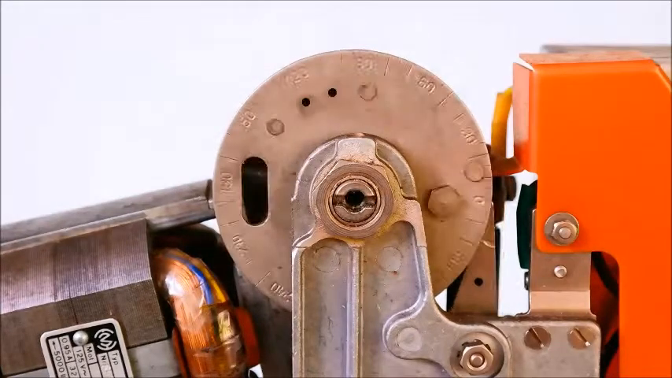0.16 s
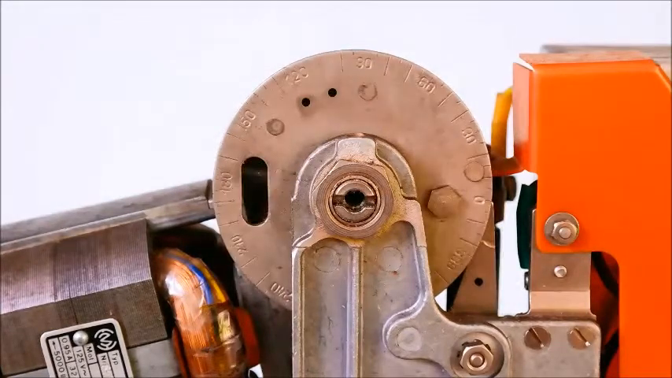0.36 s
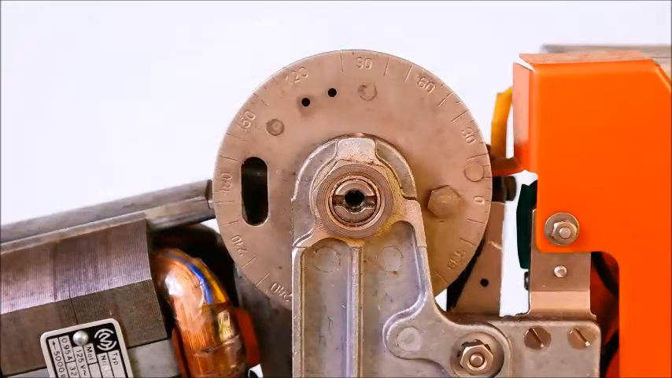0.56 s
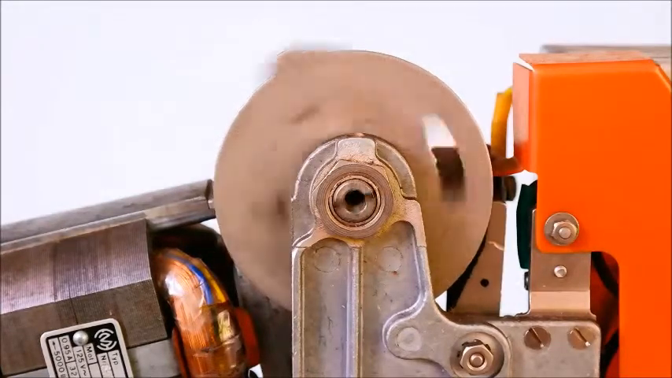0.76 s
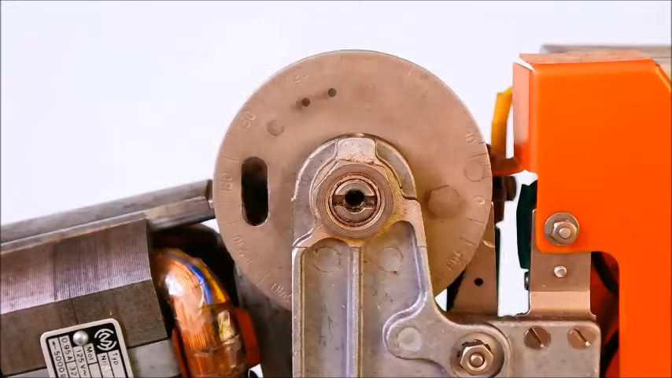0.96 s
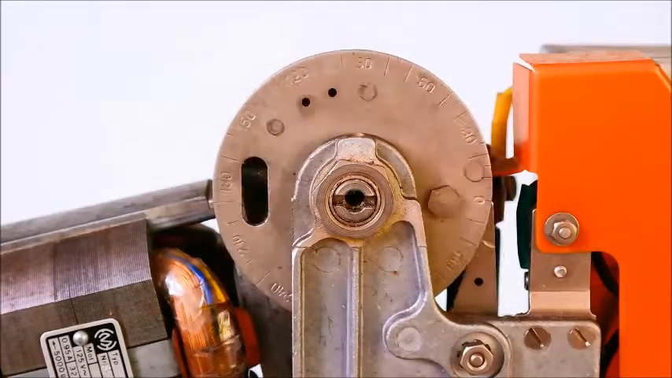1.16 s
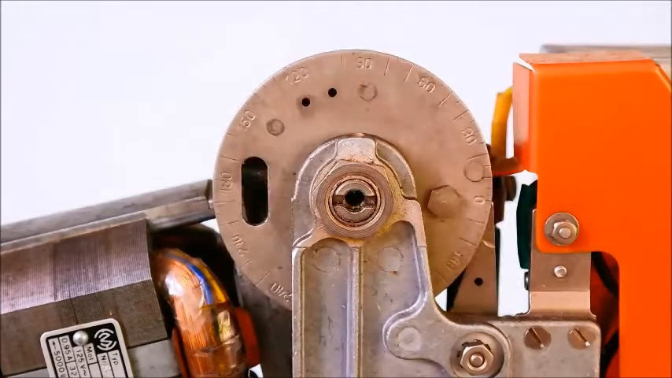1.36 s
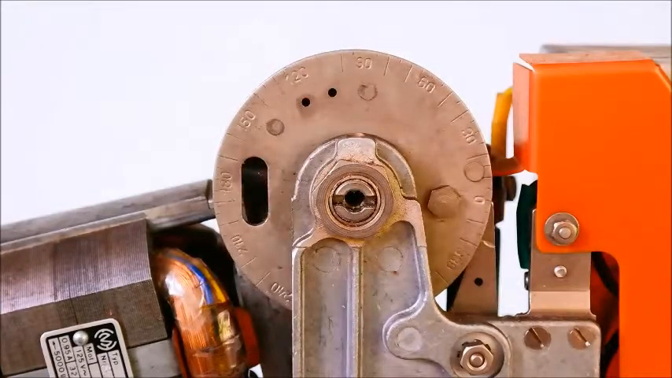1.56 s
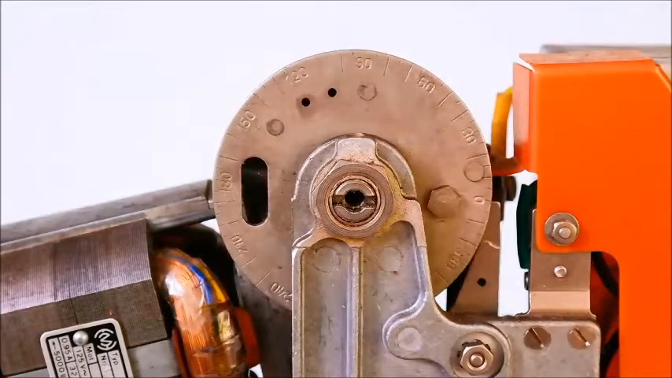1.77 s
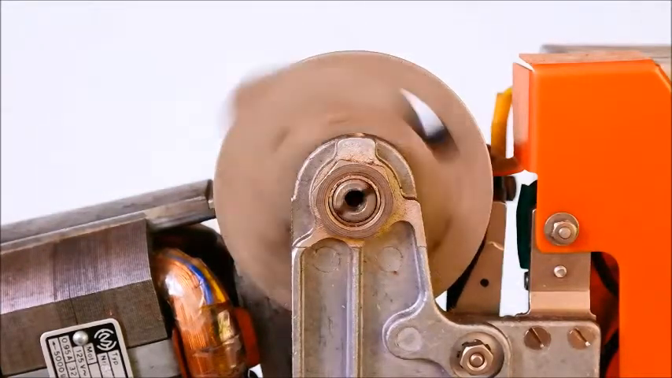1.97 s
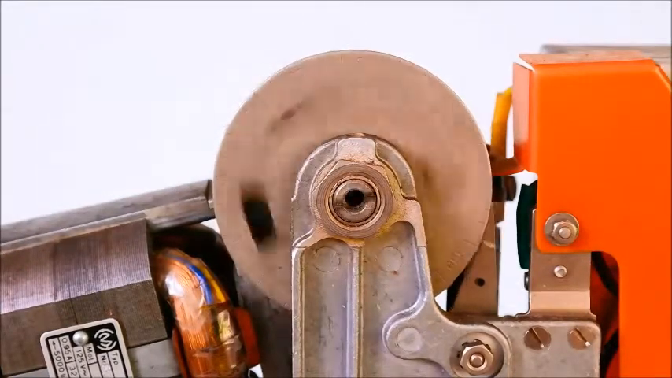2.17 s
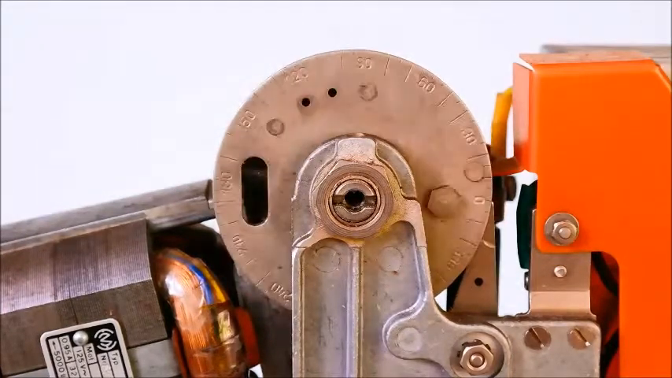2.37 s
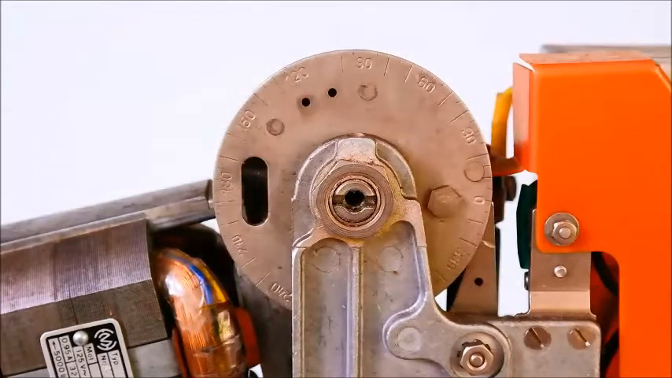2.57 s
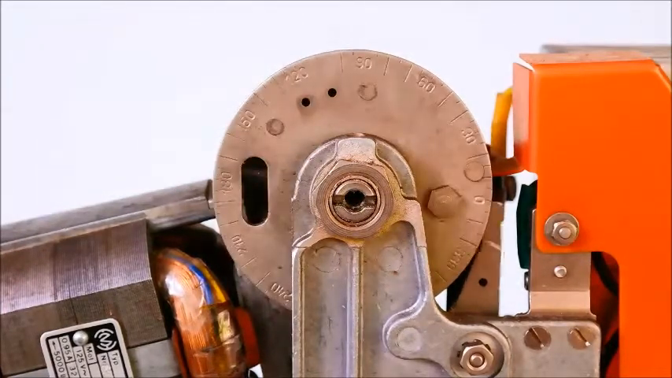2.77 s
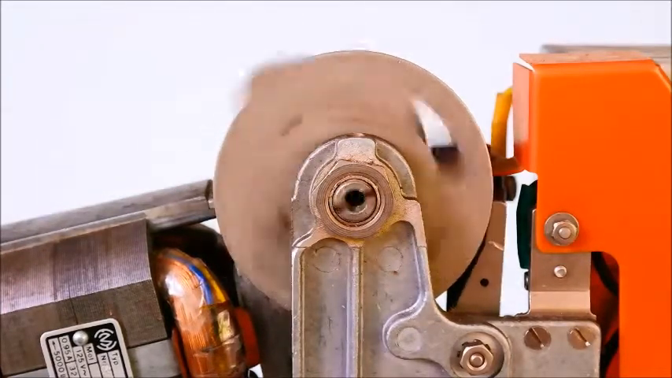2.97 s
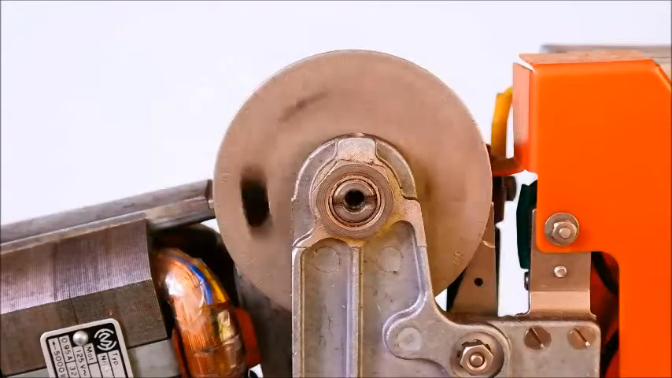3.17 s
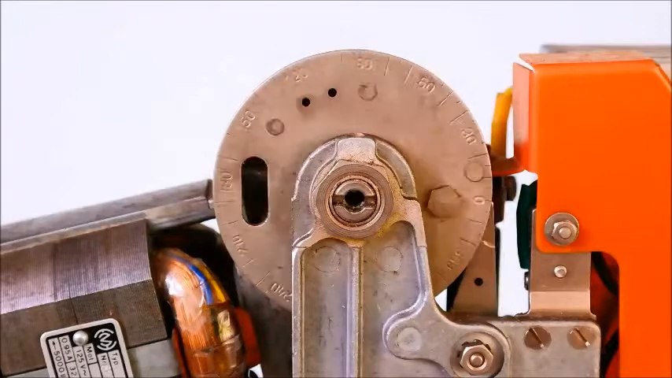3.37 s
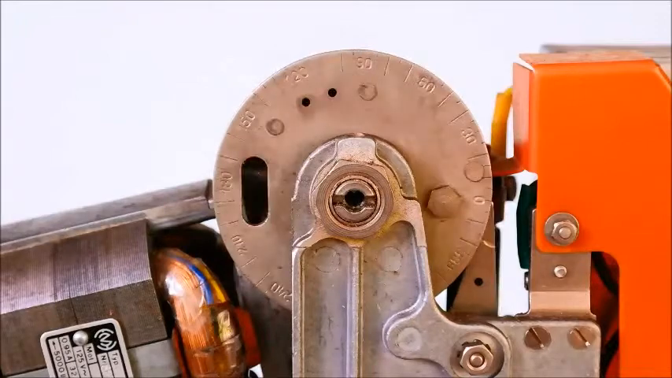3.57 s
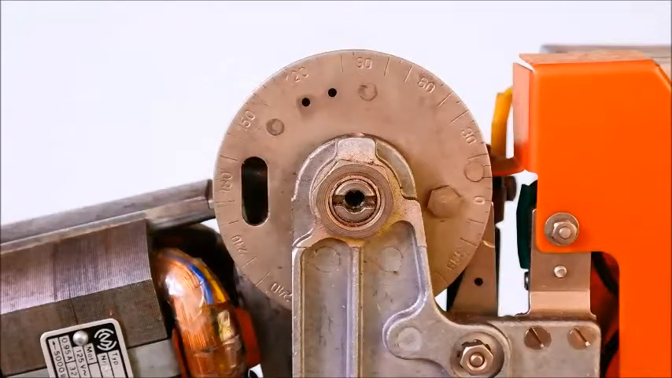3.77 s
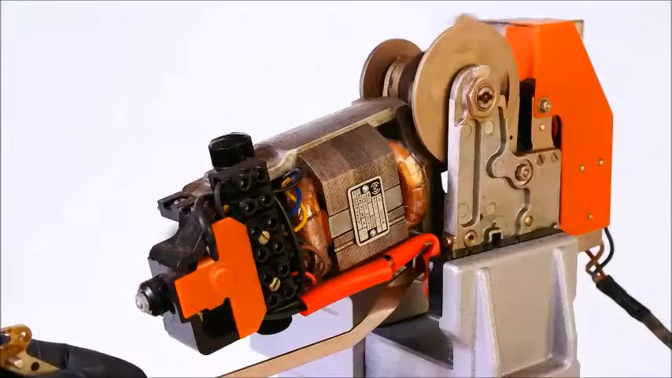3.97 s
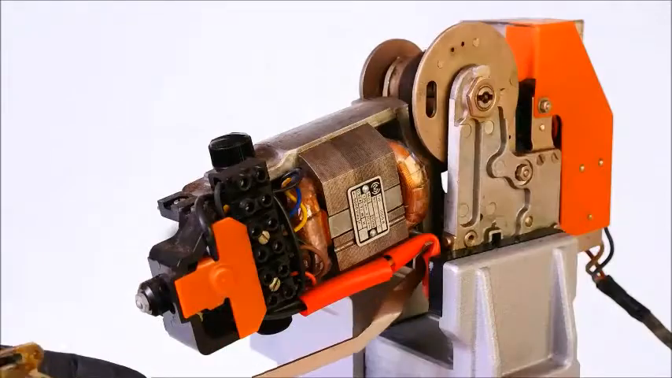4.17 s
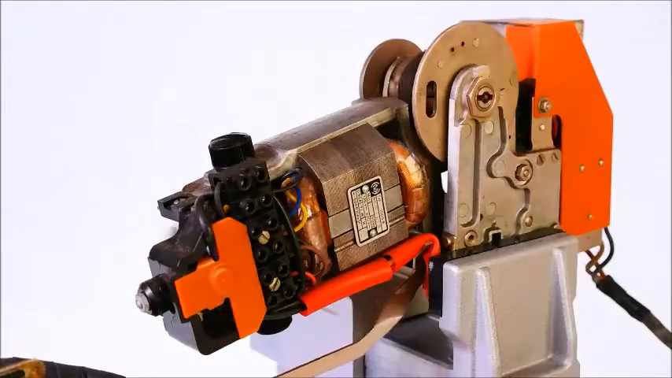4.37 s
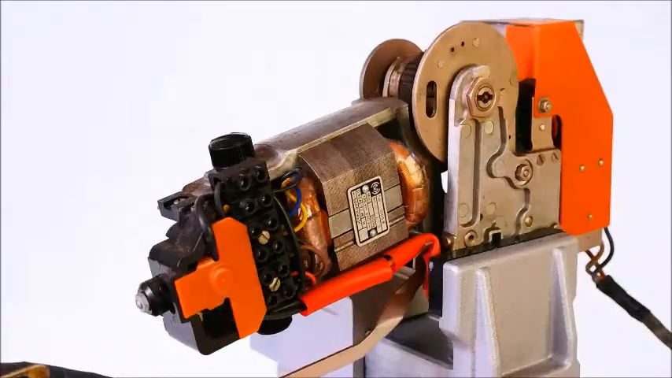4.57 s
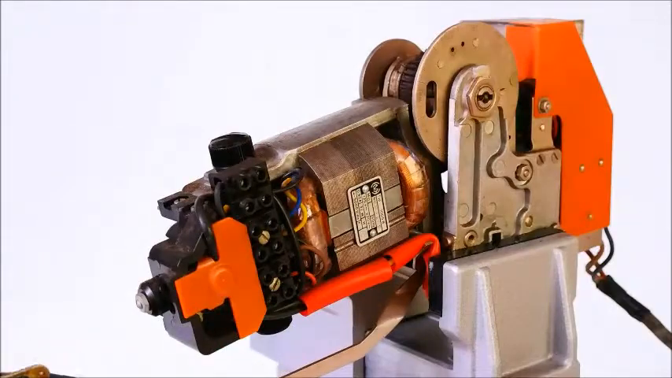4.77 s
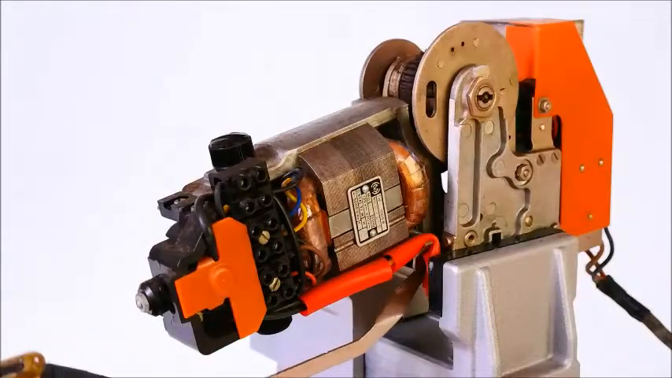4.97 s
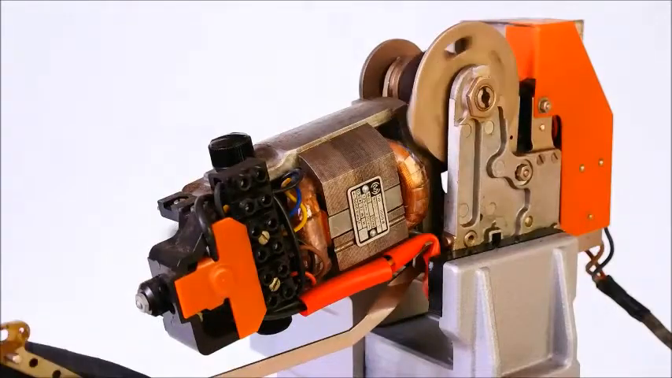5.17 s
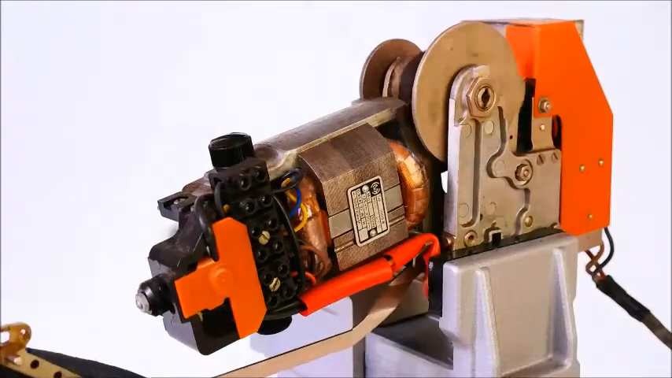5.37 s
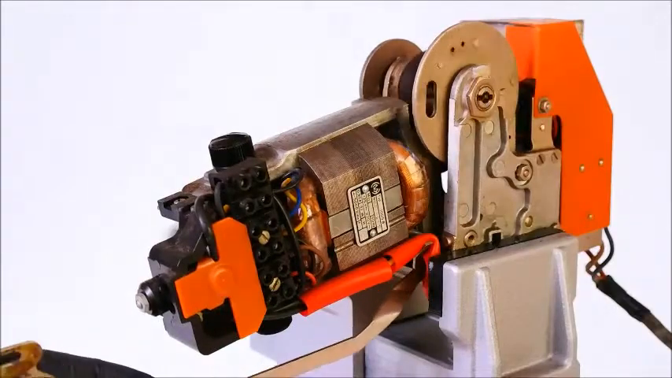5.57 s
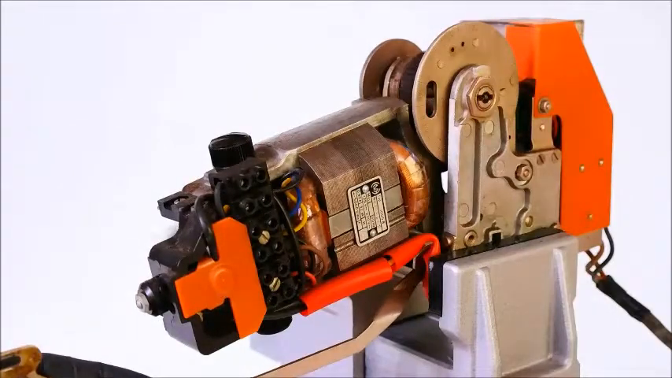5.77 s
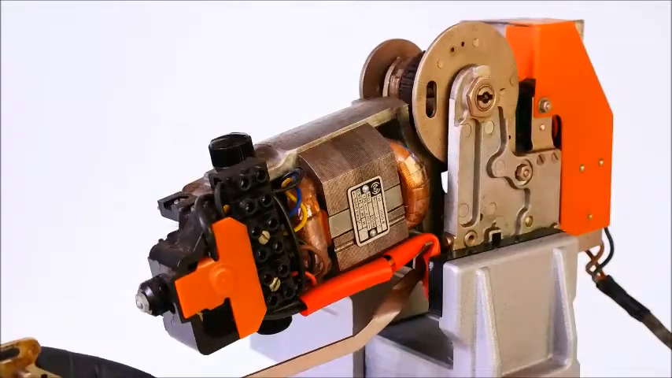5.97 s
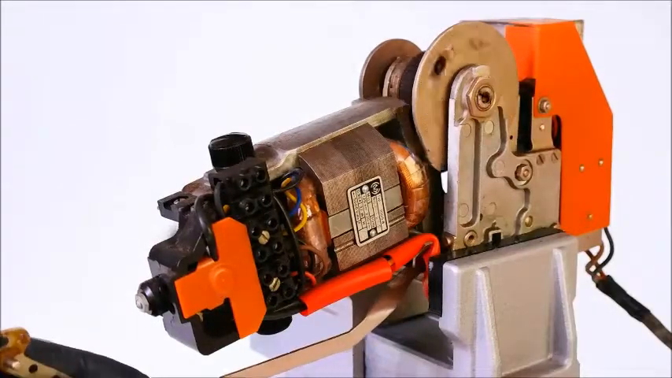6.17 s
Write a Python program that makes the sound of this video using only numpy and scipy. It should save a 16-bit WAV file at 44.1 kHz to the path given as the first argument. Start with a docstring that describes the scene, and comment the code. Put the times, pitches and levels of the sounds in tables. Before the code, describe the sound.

Close, dry stereo sound of a small mains motor and gears cycling on a table indoors, over faint low hum and air noise. At 0 s a metallic rattle ends a run and the rotor coasts down in a fluttering hiss, fading by about 0.5 s, with a small tick. A steel scrape at 0.64 s leads to a hard clack at 0.67; bright brush hiss, gear rumble and coil buzz run until a crunch and clattering release near 1.07, then coasting. Thin squeaks follow around 1.4 and 1.5 s. Similar bursts run 1.87-2.29 and 2.88-3.28 s, with low bumps at some starts and stops. At 3.87 s the sound cuts abruptly to the motor end, already spinning up, somewhat softer, releasing at 4.23. Light scraping and ticks come around 4.6-5.0 s, another burst at 5.15-5.54, and a last start with a clack at 6.20 s.

```python
"""Small mains motor, worm gear and one-turn clutch in short cycles on a table indoors, over air noise and hum.
At 0 s the pawl rattles out (struck modes) and the rotor coasts down (filtered, slot-beaten noise). From 0.64 s
a lever scrapes (stick-slip noise), the pawl clacks in, brushes and gears whirr, the coil buzzes (sines), the
pawl grinds (noise) and rattles out; thin squeaks follow. Starts near 0.67, 1.87 and 2.88 s; near 3.88 s a cut to
the motor end, already spinning up, then starts near 5.15 and 6.20 s. Low swells mark some starts and stops."""
import sys
import numpy as np
from scipy import signal
from scipy.fft import rfft, irfft, next_fast_len
from scipy.io import wavfile
from scipy.ndimage import uniform_filter1d

SR = 44100
rng = np.random.default_rng(int(sys.argv[2]) if len(sys.argv) > 2 else 0)


def output_pcm(signal):
    """Save a mono or channel-first signal as 16-bit PCM at the path in sys.argv[1].

    Samples are clipped to [-1, 1] before scaling.
    """
    pcm = np.clip(np.atleast_2d(signal).T, -1, 1) * 32767
    wavfile.write(sys.argv[1], SR, np.round(pcm).astype(np.int16))


def elevation(decibels):
    """Turn decibel levels (scalar or array-like) into linear amplitude ratios."""
    levels = np.asarray(decibels, float)
    return 10 ** (levels / 20)


N = 274302
SIZE = next_fast_len(N + 16384)
HZ, TIME = np.fft.rfftfreq(SIZE, 1 / SR), np.arange(N) / SR
TURN_S = 3.872  # cut: gear side before, motor end after
HUM_HZ = 98.9

# motor cycles: power on t/s, clutch out t/s, spin-up depth/dB (before layer share),
# base hiss level/dB, free coasting/s
CYCLES = [(-.4, 0.007, 15, -11.5, 0.34), (0.669, 1.069, 14.5, -11.5, 0.28),
          (1.866, 2.289, 29.5, -11.5, 0.34), (2.875, 3.279, 16.5, -11.5, 0.28),
          (3.877, 4.232, 8, -16.5, 0.25), (5.153, 5.539, 2.5, -17.5, .28), (6.201, 6.6, 6, -23, .28)]
# pawl modes: f/Hz, width/Hz, level/dB
PAWL_MODES = [(1430, 50, 11.5), (2920, 1240, 5), (3920, 2200, -3.5), (4970, 1200, -1), (6130, 720, 4),
              (7400, 360, 0.5), (8370, 700, -11.5), (9790, 310, 8.5), (11100, 800, -13.5), (12460, 220, 6),
              (13800, 500, 1.5), (14300, 290, 9)]


def evened(x):
    """Scales to rms 1."""
    return x / np.sqrt(np.mean(x ** 2) + 1e-20)


def smooth_noise(shape, *sizes):
    """Gaussian noise through moving averages of the given lengths in samples, rms 1."""
    x = rng.standard_normal(shape)
    for size in sizes:
        x = uniform_filter1d(x, size)
    return evened(x)


def read(points, hz):
    """Reads a table on a log-frequency axis."""
    f, value = np.transpose(points)
    return np.interp(np.log(hz + 1), np.log(f + 1), value)


def humps(peaks, hz):
    """Summed power of resonance curves."""
    return sum(elevation(db) ** 2 / (1 + (2 * (hz - f) / width) ** 2) for f, width, db in peaks)


def causal(gain, size):
    """Gives a magnitude its minimum phase, so that nothing rings before it is struck."""
    cepstrum = irfft(np.log(gain + 1e-5 * gain.max()), size)
    cepstrum[1:size // 2] *= 2
    cepstrum[size // 2 + 1:] = 0
    return np.exp(rfft(cepstrum))


def pair():
    """White noise at two microphone ports, partly shared, with phase lead and level lean by frequency."""
    # likeness of the ports: f/Hz, left-right coherence (0-1)
    likeness = [(40, 0.73), (150, 0.87), (400, 0.83), (900, 0.72), (1800, 0.51), (3000, 0.3), (6000, 0.25),
                (15000, 0.26)]
    # phase of the shared part: f/Hz, lead of left/rad
    lead_rad = [(100, -0.27), (3300, -0.13), (4200, -0.057), (6000, 0.61), (9400, 1.), (11000, 0),
                (13600, -1.1), (15500, -.3)]
    # balance: f/Hz, left minus right/dB
    lean_db = [(60, -1), (150, 1.5), (380, 0.5), (950, 1.5), (2380, -0.5), (5980, 1.5), (15000, 1.5)]
    left, other = rfft(rng.standard_normal((2, SIZE)))
    same = np.clip(read(likeness, HZ), 0, 1)
    right = same * left * np.exp(-1j * read(lead_rad, HZ)) + np.sqrt(1 - same ** 2) * other
    balance = elevation(np.outer([.5, -.5], read(lean_db, HZ)))
    return irfft(np.array([left, right]) * balance, SIZE)[:, :N]


def colour(x, gain):
    """Filters white sound by a magnitude scaled to mean power 1."""
    return irfft(rfft(x, SIZE) * causal(evened(gain), SIZE), SIZE)[:, :N]


def powered(fade_s=0.004):
    """1 from power on to clutch out, then a linear fade to 0."""
    return sum(np.clip((off + fade_s - TIME) / fade_s, 0, 1) * (TIME >= on) for on, off, *_ in CYCLES)


def hum_level(surge_s=0.057, dip_db=-15, dip_after_s=0.075, dip_s=0.042,
              fade_db=-7, fade_after_s=0.51, fade_s=.05):
    """Hum gain: up under power, surging at switch-on, dipping briefly after clutch out, fainter at rest."""
    # hum at the gear side: idle level/dB, powered level/dB, surge/dB
    hum_side = (-56.5, -45.5, 8.2)
    # hum at the motor end: same columns
    hum_end = (-56.5, -52, .1)
    idle_db, on_db, surge_db = np.where(TIME > TURN_S, np.reshape(hum_end, (3, 1)), np.reshape(hum_side, (3, 1)))
    since_on, since_off = np.zeros(N), np.zeros(N)
    for on, off, *_ in CYCLES:
        since_on = np.where(TIME >= on, TIME - on, since_on)
        since_off = np.where(TIME >= on, TIME - off, since_off)
    db = idle_db + (on_db - idle_db) * powered() + surge_db * np.exp(-since_on / surge_s)
    db = db + dip_db * np.exp(-((since_off - dip_after_s) / dip_s) ** 2)
    db = db + fade_db * np.clip((since_off - fade_after_s) / fade_s, 0, 1)
    return uniform_filter1d(elevation(db), size=600)


def room(waver_db=5.0, masked=.6):
    """Air noise, wavering hum at twice mains frequency; motor-end whines, weaker under power."""
    # air at the gear side: f/Hz, relative density/dB per Hz
    air_side = [(15, -31), (40, -12), (107, -1), (157, -3), (269, -1.5), (371, -8), (654, -9), (729, -14.5),
                (2260, -22), (4100, -18.5), (15800, -26.5)]
    # air at the motor end: f/Hz, relative density/dB per Hz
    air_end = [(15, -30), (25, -12), (144, -10), (307, -13), (392, -16.5), (572, -19.5), (710, -19),
               (791, -24), (955, -25), (2030, -28.5), (8490, -32), (9460, -33), (15800, -33)]
    # narrow noise tones: f/Hz, width/Hz, unmasked level/dB
    tones = [(48.5, 2.8, -56), (7200, 30, -71), (9430, 30, -77)]
    end = TIME > TURN_S
    air = colour(pair() * elevation(-54.5) * ~end, elevation(read(air_side, HZ)))
    air += colour(pair() * elevation(-51.5) * end, elevation(read(air_end, HZ)))
    waver = evened(elevation(waver_db * smooth_noise((2, N), 1200, 800)))
    hum = np.sqrt(2) * hum_level() * waver * np.sin(2 * np.pi * (HUM_HZ * TIME + rng.random()))
    unmasked = end * (1 - masked * uniform_filter1d(powered(), size=2000))
    whines = sum(colour(pair() * elevation(db) * unmasked, humps([(hz, width, 0)], HZ)) for hz, width, db in tones)
    return air + hum + whines


def squeaks():
    """Narrow noise bands under half-sine envelopes: thin fuzzy whistles as things settle."""
    # whistles: start t/s, end t/s, f/Hz, level/dB
    whistles = [(1.357, 1.447, 2800, -46.5), (1.468, 1.588, 5370, -58), (1.71, 1.768, 4880, -74.5)]
    out = 0
    for s, end, hz, db in whistles:
        swell = np.sin(np.pi * np.clip((TIME - s) / (end - s), 0, 1))
        out = out + colour(pair() * elevation(db) * swell, humps([(hz, 260, 0)], HZ))
    return out


def lurches():
    """Frame rocking on the table at starts and stops: half-sine swells on linear glides."""
    # swells: t/s, start f/Hz, end/start frequency ratio, length/s, level/dB
    swells = [(.67, 158.4, 1.27, 0.063, -34), (1.87, 158, 1.2, 0.058, -40), (2.267, 35, 1.6, .05, -44),
              (2.95, 175, 1.05, 0.076, -35), (3.267, 35, 0.96, .04, -60), (4.16, 289.6, 0.98, 0.062, -28.5),
              (5.467, 280, 1.08, 0.062, -33)]
    out = 0
    for s, hz, glide, length_s, db in swells:
        u = np.clip((TIME - s) / length_s, 0, 1)
        cycles = hz * length_s * (u + (glide - 1) * u ** 2 / 2)
        out = out + elevation(db) * np.sin(np.pi * u) * np.sin(2 * np.pi * cycles)
    return np.sqrt(2) * out


def buzz(waver_db=6.0):
    """Powered field coil: hum overtones as sines, each with its own slow random waver."""
    # overtones: multiple of hum, gear-side level/dB, motor-end level/dB (both before waver)
    overtones = [(2, -49, -54.5), (3, -55.5, -50.5), (6, -50, -50), (8, -52.5, -45.5), (10, -49.5, -49.5),
                 (14, -57, -50.5)]
    out = 0
    for multiple, side_db, end_db in overtones:
        waver = np.clip(smooth_noise(N, 1500, 1000), -3, 1.2)
        db = np.where(TIME > TURN_S, end_db, side_db) + waver_db * waver
        out = out + elevation(db) * np.sin(2 * np.pi * (multiple * HUM_HZ * TIME + rng.random()))
    return np.sqrt(2) * out * uniform_filter1d(powered(), size=400)


def lever(stick_db=1.5, rise_share=.25):
    """Steel dragged on steel: randomly sticking and slipping noise rings the release lever."""
    # drags: start t/s, end t/s, first level/dB, last level/dB
    scrapes = [(0.639, 0.661, -36.5, -39.5), (2.824, 2.87, -36, -49), (3.763, 3.868, -43, -44),
               (4.61, 4.69, -47, -58)]
    # lever modes: f/Hz, width/Hz, level/dB
    lever_modes = [(409, 62, -12), (910, 290, -5.5), (1770, 280, -11.5), (2850, 190, -5),
                   (4660, 300, -11.5), (6050, 440, -13.5), (7900, 490, -13), (10300, 390, -8.5),
                   (12200, 500, -15.5), (14100, 600, -17)]
    slips = evened(elevation(stick_db * smooth_noise(N, 120)))
    drag = 0
    for s, end, first_db, last_db in scrapes:
        rise = np.clip((TIME - s) / (end - s) / rise_share, 0, 1)
        drag = drag + elevation(np.interp(TIME, [s, end], [first_db, last_db])) * rise * (TIME < end)
    return colour(pair() * slips * drag, np.sqrt(humps(lever_modes, HZ)))


def crunch(lead_s=0.0385, side_db=-21, end_db=-24, chatter_db=5.0):
    """Pawl grinding up the cam just before clutch out: chattering noise through pawl and cam bands."""
    # cam bands: f/Hz, width/Hz, level/dB
    cam_bands = [(1400, 810, -9.5), (3200, 1600, -6), (6200, 1900, 0.5)]
    grind = 0
    for _, off, *_ in CYCLES:
        grind = grind + elevation(end_db if off > TURN_S else side_db) * ((TIME > off - lead_s) & (TIME < off))
    chatter = evened(elevation(chatter_db * smooth_noise(N, 90)))
    drive = pair() * uniform_filter1d(grind, size=150) * chatter
    return colour(drive, np.sqrt(humps(PAWL_MODES, HZ) * humps(cam_bands, HZ)))


def blows(plate_hz=1400, pivot_hz=6200, tick_plate_db=-28):
    """Every blow as (s, spectrum): colour of its kind, tilted about the pivot, over the plate's ring."""
    # pawl drops in: t/s, level/dB, added tilt/dB per octave
    engages = [(0.6667, 4.5, 0), (1.9257, 1, 1), (2.8748, 2.5, -0.5), (5.15, 0.5, 0), (6.1958, -1, 7)]
    # its impacts: delay/s, level re drop/dB, tilt/dB per octave, plate level re drop/dB
    bounces = [(0, 0, -0.6, -24), (.0021, -3, 1.5, -22.5), (.0048, -11, -4.5, -24), (0.0104, -15, 4.5, -22)]
    # pawl rattles out: t/s, level/dB, tilt/dB per octave, plate level/dB
    rattles = [(.0033, 3, -2, -11), (.0048, 7, 1.5, -25.5), (.0095, -12, 5, -10), (1.032, -9, 2, -19.5),
               (1.0434, -1, -7.5, -1), (1.0518, -6.5, 0.3, -19), (1.0654, 8.5, 1, -32),
               (1.073, -4, 0, -5.5), (1.0773, -14, 4, -21.5), (2.2528, -2, -5, -38), (2.2658, 0, -2, -6),
               (2.2728, 4.5, 1.5, -15), (2.2869, 1, 4, -17.5), (2.287, 2.5, 7, -20.5), (2.293, -4.5, 9, -6),
               (2.298, -11, 9, -28), (3.241, -7, -5, -10), (3.2557, -2, -1, -19), (3.263, -1, 6, -27),
               (3.277, 5, 6, -25), (3.2808, -4, 2, -5), (3.288, -12, 11, -6), (4.2203, -11, 9, -3.5),
               (4.227, -1, 0, -7), (4.232, 0, -0.5, -16.5), (4.236, -13, 6, -15), (5.524, -18, 8, -9),
               (5.537, -2.5, 4.5, -9.5), (5.542, -8, 6, -12)]
    # loose parts tick as things settle or the lever is touched: t/s, level/dB, tilt/dB per octave
    ticks = [(0.4278, -16, -1.5), (.4365, -32, 3), (1.8455, -35, 5), (1.8707, -26, 1), (3.6865, -34, .1),
             (3.71, -32, .1), (4.608, -24, 3), (4.804, -28, -3), (4.852, -32.5, 3.5), (4.999, -30.5, 2),
             (5.9763, -36.5, 2)]
    # colour of drops: f/Hz, level/dB
    engage_colour = [(3500, -13), (6200, -5), (10000, -2), (14000, -2)]
    # colour of rattles: f/Hz, level/dB
    rattle_colour = [(3500, -16.5), (6200, 1), (10000, -7), (14000, -13.5)]
    # colour of ticks: f/Hz, level/dB
    tick_colour = [(3500, 0.5), (6200, 0.5), (10000, -13), (14000, -7.5)]
    rows = []
    for s, db, lean in engages:
        for later_s, less_db, tilt, plate_db in bounces:
            rows.append((s + later_s, db + less_db, tilt + lean, db + plate_db, engage_colour))
    rows += [(*row, rattle_colour) for row in rattles]
    rows += [(s, db, tilt, db + tick_plate_db, tick_colour) for s, db, tilt in ticks]
    out = []
    for s, db, tilt, plate_db, kind in rows:
        tinted = [(f, db + tint_db + tilt * np.log2(f / pivot_hz)) for f, tint_db in kind]
        out.append((s, [(plate_hz, plate_db)] + tinted))
    return out


def clacks(chatter_s=0.0012, rise_s=0.00018, tail_s=.007, tail_db=-18):
    """Each blow is a noise burst of a few ms exciting the modes of pawl and plate."""
    size = 4096
    t, hz = np.arange(size // 4) / SR, np.fft.rfftfreq(size, 1 / SR)
    shape = (1 - np.exp(-t / rise_s)) * (np.exp(-t / chatter_s) + elevation(tail_db) * np.exp(-t / tail_s))
    modes, drive, out = np.sqrt(humps(PAWL_MODES, hz)), pair(), np.zeros((2, N + size))
    for s, spectrum in blows():
        at = round(s * SR)
        blow = rfft(np.roll(drive, -at, 1)[:, :len(t)] * shape, size)
        # evens out the burst's random spectrum, so each blow keeps its set level
        spread = uniform_filter1d((abs(blow) ** 2).mean(0), size=240)
        even = np.linalg.norm(shape) / np.sqrt(spread + 1e-12)
        tilt = elevation(read(spectrum, hz))
        out[:, at:at + size] += irfft(blow * causal(even * modes * tilt, size), size)
    return out[:, :N]


def running(grip_s=0.22):
    """Slot-beat speed, 0-1: 1 to clutch out, linear to 0 at rest, linear back to 1 by the next start."""
    times = [(on, off, off + free_s + grip_s) for on, off, *_, free_s in CYCLES]
    return np.interp(TIME, np.ravel(times), np.tile([1, 1, 0], len(CYCLES)))


def follow(side, end, spin_up_s=0.054, spin_up_bend=1.1, strain_s=0.013, let_go_s=.018, knee_s=0.045):
    """Gain of one layer: spin-up, load, strain, release, coasting, then a quick fall to rest."""
    out = np.zeros(N)
    for on, off, rise_db, hiss_db, free_s in CYCLES:
        db, share, load, strain_db, coast_db, coast, grip = end if off > TURN_S else side
        t, u = np.clip(TIME - on, 0, off - on), np.maximum(TIME - off, 0)
        run_db = db - share * rise_db * np.exp(-(t / spin_up_s) ** spin_up_bend)
        run_db = run_db + load * t + strain_db * np.exp((t - off + on) / strain_s)
        free_db = coast_db + coast * u + grip * knee_s * np.logaddexp(0, (u - free_s) / knee_s)
        held = np.exp(-u / let_go_s)
        out = np.where(TIME >= on, elevation(hiss_db + held * run_db + (1 - held) * free_db), out)
    return uniform_filter1d(out, size=60)


def casting(ring, strength, hollows, dense_db=1.3):
    """Cast-frame magnitude: listed resonances and hollows over dense random ripple."""
    bins = round(50 * SIZE / SR)  # 50 Hz
    ripple = elevation(dense_db * smooth_noise(len(HZ), bins, bins))
    return ripple * np.sqrt((1 + strength * humps(ring, HZ)) / (1 + humps(hollows, HZ)))


def drifting(x, patch_db=2.2):
    """Random patches of the spectrum swell and sink."""
    z = signal.stft(x, nperseg=512, noverlap=384)[2]
    patches = uniform_filter1d(rng.standard_normal(z.shape[1:]), size=3, axis=0)
    patches = uniform_filter1d(patches, size=20, axis=1)
    gain = evened(elevation(patch_db * evened(patches)))
    return signal.istft(z * gain, nperseg=512, noverlap=384)[1][:, :N]


def whirr(split_hz=2300, slots_hz=564, grit_db=1.18, knock_db=1.0, beat=.05, slow_beat=0.14, second=.7,
          idle=0.45):
    """Brush hiss and gear rumble as noise; commutator slots beat the hiss more as the rotor slows."""
    # layers at gear side, then motor end: level re base hiss/dB, share of spin-up, load slope/dB per s,
    # strain before release/dB, coasting start/dB, coasting slope/dB per s, added slope once gripped/dB per s
    hiss_side = (0.5, 1., -10.5, 1.5, -11, -7.5, -160)
    rumble_side = (-16.5, 0.54, -4, -0.8, -21, -24, -82)
    hiss_end = (0, 1., 4, 6.5, -3.5, -26, -120)
    rumble_end = (-11.5, 0.7, 10.5, -3, -12.5, -41, -64)
    # colours, loaded and coasting, by listening side: f/Hz, relative density/dB per Hz
    loaded_side = [(60, -26.5), (130, -7.5), (250, -8), (450, -2.5), (800, -4), (1400, -11), (2400, -11),
                   (3500, -7.5), (5500, -4.5), (8200, -6), (10300, 0.5), (12300, -1), (14200, 1.5),
                   (15700, -1.5)]
    coast_side = [(60, -24.5), (130, -14.5), (250, -5.5), (450, -1), (800, 0), (1400, -3.5), (2400, -2.5),
                  (3500, -4), (5500, -2.5), (8200, -3), (10300, -0.5), (12300, -2.0), (14200, 1),
                  (15700, -2)]
    loaded_end = [(60, -22.5), (130, -9.5), (250, -5.5), (450, -5), (800, -4), (1400, -6.5), (2400, -10),
                  (3500, -7.5), (5500, -5), (8200, -5), (10300, -0.5), (12300, -4.5), (14200, 1.5),
                  (15700, -8.5)]
    coast_end = [(60, -14.5), (130, -7), (250, -2), (450, -1), (800, -1), (1400, -1.5), (2400, -1.5),
                 (3500, -4.5), (5500, -2.5), (8200, -2), (10300, 0.5), (12300, -4), (14200, 2),
                 (15700, -0.5)]
    # frame resonances by side: f/Hz, width/Hz, level re colour/dB (before casting strength)
    ring_side = [(196, 39, -0.5), (277, 29, 2.5), (816, 54, 3.5), (1003, 20, 8), (1225, 33, 9),
                 (1446, 26, 10.5), (1995, 150, 5), (5900, 220, -6), (6300, 200, -5.5), (9260, 100, 1),
                 (9975, 150, 1), (11320, 150, 1.5), (11900, 100, -1), (12730, 100, -2.5),
                 (13800, 350, -0.5), (14500, 340, 0)]
    ring_end = [(280, 40, 7), (340, 22, 4.5), (797, 26, 12), (985, 16, 10), (1490, 26, 0.5),
                (1238, 26, 1.5), (2000, 72, -5), (3240, 300, -7), (5290, 130, -10), (6780, 140, -6),
                (9900, 240, 3), (10820, 160, 4.5), (12950, 300, 0.5), (15130, 300, 3)]
    # where the table's echo cancels: f/Hz, width/Hz, strength/dB
    echo_hollows = [(1830, 66, 2), (2423, 180, 4), (3673, 100, 2.5)]
    # gear side only: f/Hz, width/Hz, strength/dB
    side_hollows = echo_hollows + [(347, 40, 4)]

    speed, load = running(), powered()
    turns = 2 * np.pi * np.cumsum(slots_hz * speed) / SR
    slots = 1 + (beat + slow_beat * (1 - speed)) * (np.cos(turns) + second * np.cos(2 * turns))
    grit = elevation(grit_db * smooth_noise(N, 40))  # sparks and chatter
    knock = elevation(knock_db * smooth_noise(N, 300, 200))  # uneven teeth
    hiss = follow(hiss_side, hiss_end) * evened(slots * grit)
    rumble = follow(rumble_side, rumble_end) * evened(knock)
    high = 1 / (1 + (split_hz / (HZ + 1)) ** 4)  # power share of the hiss
    side_cast, end_cast = casting(ring_side, 0.64, side_hollows), casting(ring_end, 0.97, echo_hollows)
    # unloaded gears shake the frame less
    side_idle, end_idle = casting(ring_side, idle, side_hollows), casting(ring_end, idle, echo_hollows)
    end, out = TIME > TURN_S, 0
    for share, spectrum, cast in [(load * ~end, loaded_side, side_cast), ((1 - load) * ~end, coast_side, side_idle),
                                  (load * end, loaded_end, end_cast), ((1 - load) * end, coast_end, end_idle)]:
        gain = elevation(read(spectrum, HZ)) * cast
        out = out + colour(pair() * np.sqrt(share) * hiss, gain * np.sqrt(high))
        out = out + colour(pair() * np.sqrt(share) * rumble, gain * np.sqrt(1 - high))
    return out


def bass_control(x, bass_hz=78, knee_db=-27, slope=0.34, back_db_per_s=119.5):
    """Gain control on the bass alone: falls at once with loud sound, comes back steadily."""
    power_db = 10 * np.log10(abs(uniform_filter1d((x ** 2).mean(0), size=400)) + 1e-12)
    back_db = TIME * back_db_per_s
    held_db = np.maximum.accumulate(power_db + back_db) - back_db
    over_db = np.maximum(held_db - knee_db, 0)
    bass = irfft(rfft(x, SIZE) / (1 + (HZ / bass_hz) ** 6), SIZE)[:, :N]
    return x - bass * (1 - elevation(-slope * uniform_filter1d(over_db, size=400)))


def scene():
    """All sources at the two ports."""
    return drifting(whirr()) + buzz() + lurches() + clacks() + crunch() + lever() + squeaks() + room()


def top_cut(x):
    """Nothing passes above the cut-off."""
    return signal.sosfilt(signal.butter(12, 16500, fs=SR, output="sos"), x)


def record(dry, edge_hz=15740):
    """Bass control, a steep band edge, clipping at full scale."""
    edge = elevation(np.interp(HZ, [edge_hz, edge_hz + 60], [0, -45]))
    full = irfft(rfft(bass_control(dry), SIZE) * edge, SIZE)[:, :N]
    return top_cut(np.clip(full, -1, 1))


dry = scene()
out = record(dry)
output_pcm(out)
```